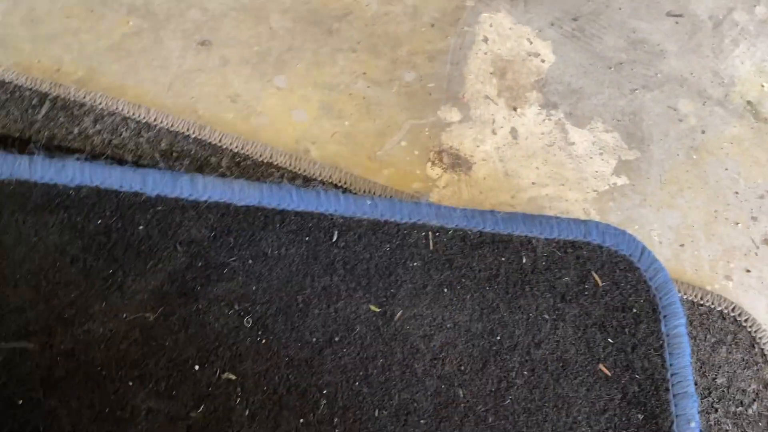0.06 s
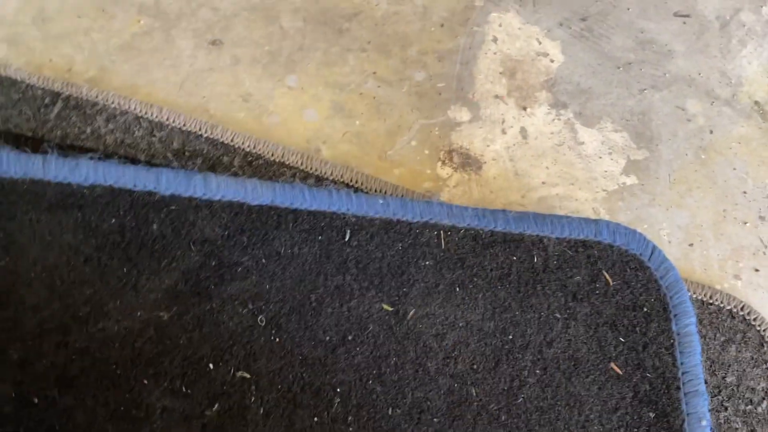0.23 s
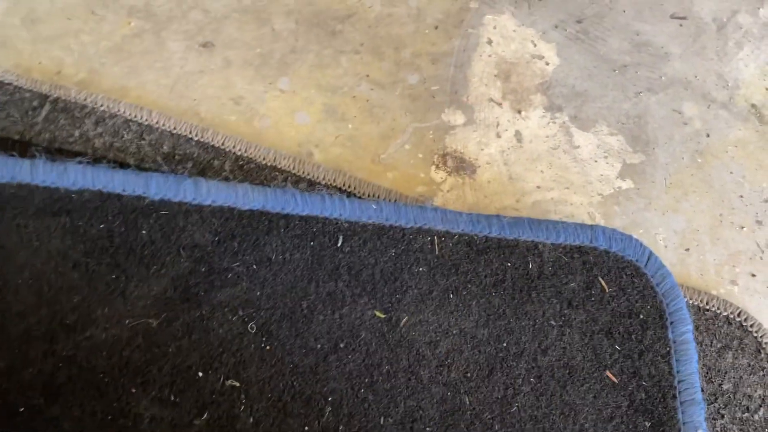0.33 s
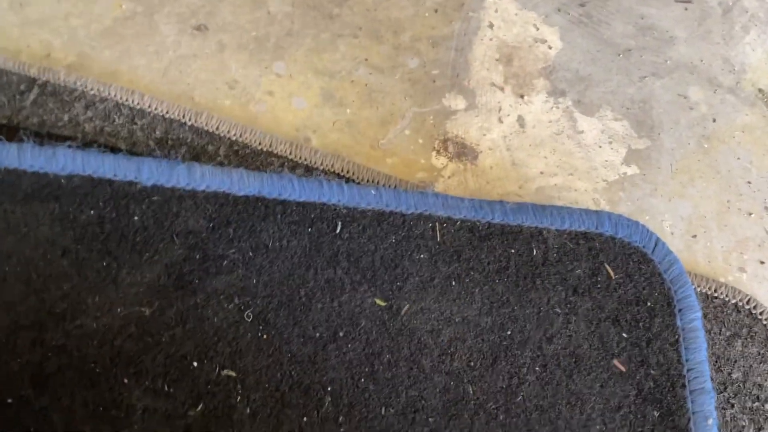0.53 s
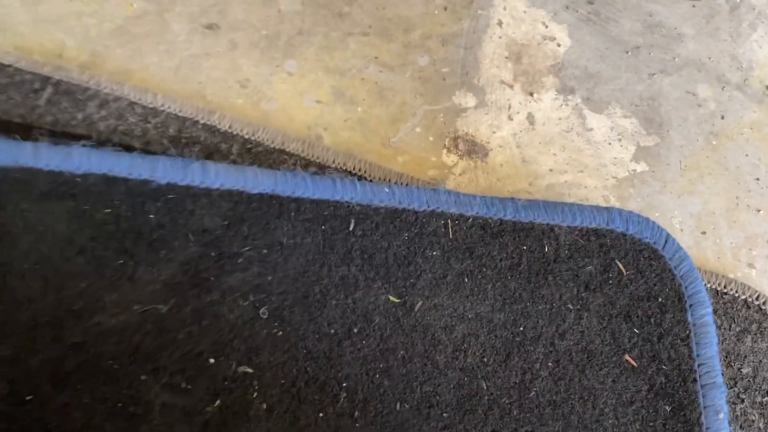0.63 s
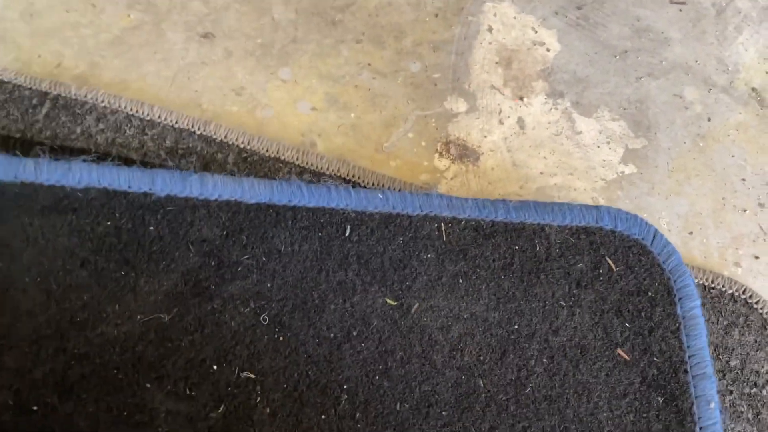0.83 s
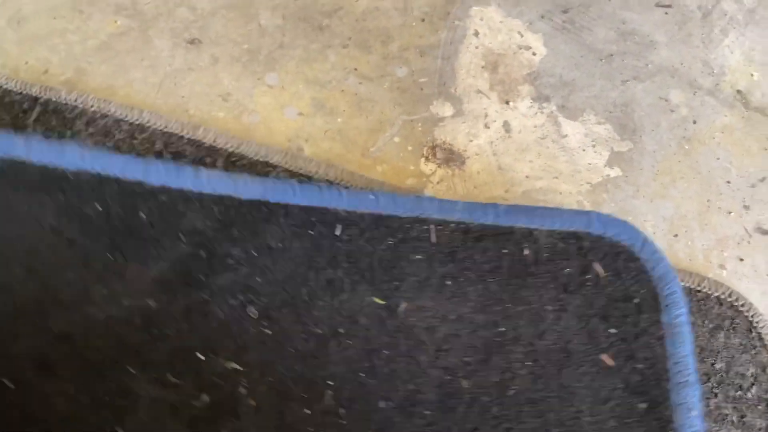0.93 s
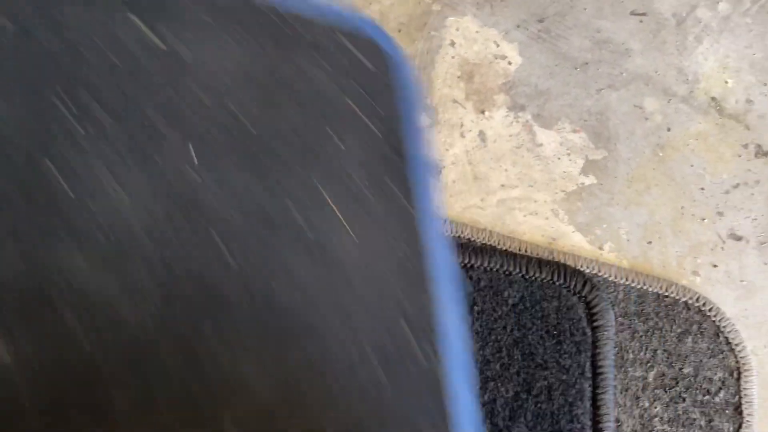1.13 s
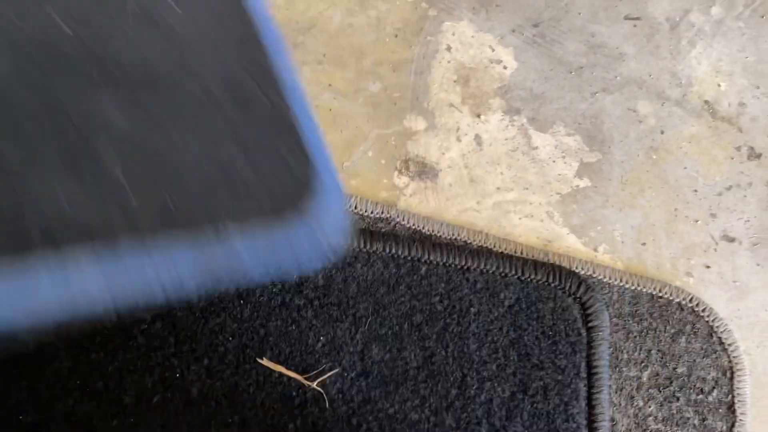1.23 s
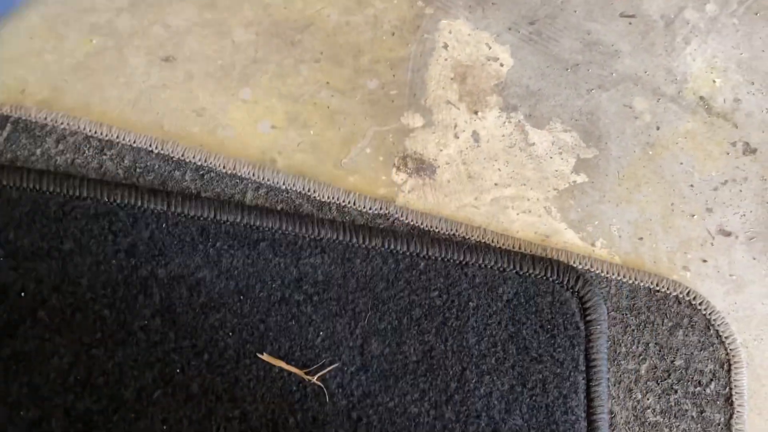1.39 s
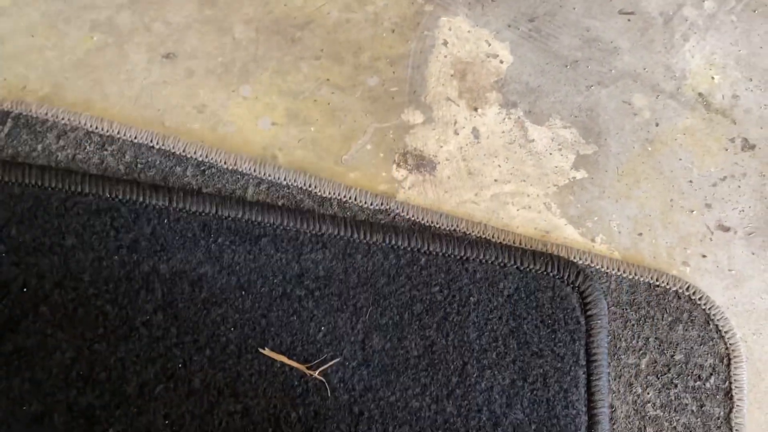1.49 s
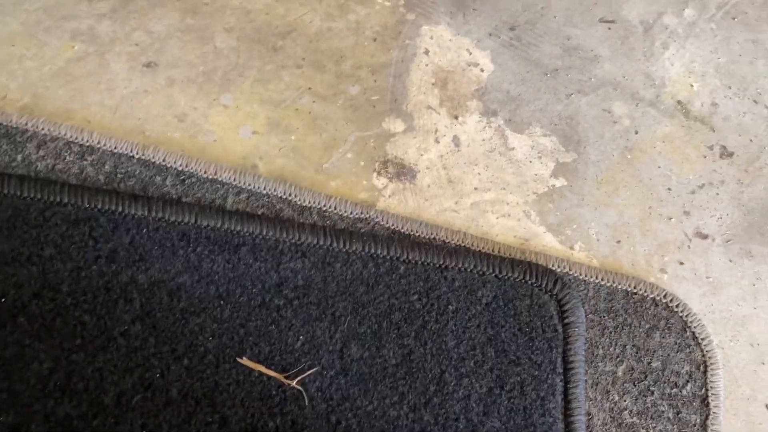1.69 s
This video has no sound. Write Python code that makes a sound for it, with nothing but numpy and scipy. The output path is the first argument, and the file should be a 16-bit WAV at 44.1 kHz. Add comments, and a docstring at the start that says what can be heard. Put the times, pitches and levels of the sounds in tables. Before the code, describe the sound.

A car floor mat drops with a dull thump and slapping scuff, then faint edge ticks, a soft drag and a lighter landing; close stereo microphone, low hum, small hard garage echo.

```python
"""A low hum and faint room hiss come first; then a car floor mat drops and slaps on a concrete garage floor.
A hand ticks on its edge, it is pulled off the pile and lands aside, close to a hand-held stereo microphone.
Thumps are waves of falling pitch, slaps and ticks ring the mat's modes, drags and fibre rub are dense grains.
Feedback delays give the garage's echo; shaped noise makes the hum and hiss."""
import sys
import numpy as np
from scipy import signal
from scipy.fft import rfft, irfft, next_fast_len
from scipy.io import wavfile

SR = 44100
rng = np.random.default_rng(int(sys.argv[2]) if len(sys.argv) > 2 else 0)


def dump_mix(stems):
    """Bounce the given channels to the path in sys.argv[1] as a 16-bit WAV at rate SR."""
    frames = np.atleast_2d(stems).T  # one column per channel
    limited = np.clip(frames, -1, 1)  # hard clip at full scale
    pcm = np.round(limited * 32767).astype(np.int16)
    wavfile.write(sys.argv[1], SR, pcm)


N = 77175

# Bending thumps of the rubber backing; level is before rise and fade, pitch starts this far above THUMP_END_HZ:
# start_s [s], level_db [dB], pitch_above_end_hz [Hz], glide_s [s], rise_s [s], fade_s [s]
BENDING_THUMPS = [(.2343, -5, 330, .05, .008, .0035), (.2402, -22, 100, .01, .002, .022),
                  (.2464, -28, 230, .1, .002, .012), (.2950, -13, 300, .006, .002, .007),
                  (.8759, -27.5, 1400, .0028, .0002, .016), (1.4326, -20, 950, .015, .0004, .003),
                  (1.4361, -27, 950, .004, .0004, .009), (1.4380, -33, 20, .01, .002, .03)]
# The backing slaps down, level before SLAP_TRIM_DB:
# start_s [s], level_db [dB], brightness_db [dB per octave about 2 kHz]
BACKING_SLAPS = [(.2650, -26, 2), (.2672, -15, 2), (.2705, -16, 1), (.2755, -21, 1), (.2798, -23, 0),
                 (.2875, -16.5, 1.5), (.2941, -14, 2.5), (.3030, -22, 0), (.3085, -21, -1),
                 (.3195, -26, -2), (.3330, -28, -1), (1.4325, -30, -6), (1.4780, -40, 3)]
# Light ticks on the edge binding, and from 1.047 s to 1.064 s dull knocks of the mat scuffing as it drags;
# level before TICK_TRIM_DB: # start_s [s], level_db [dB], brightness_db [dB per octave about 2 kHz]
TICKS_AND_KNOCKS = [(.5450, -50, 3), (.5945, -50, 3), (.7198, -48, 0), (.8149, -41, -.5), (.8204, -43, 1.5),
                    (.8280, -39.5, .5), (.8358, -46, 1), (.9830, -47, 0), (1.0340, -52, -5), (1.0470, -54, -5),
                    (1.0560, -54, -5), (1.0640, -55, -5), (1.3700, -49, 3), (1.5963, -42, 1), (1.5986, -46, 0)]
# Modes of the mat on concrete: pitch_hz [Hz], level_db [dB]
MAT_MODES = [(330, 0), (440, -2), (630, -4), (850, -5), (1040, -5), (1500, -6), (1940, -2), (2550, -4),
             (3900, -6), (5200, -5), (6500, -7), (8500, -11), (10500, -8), (13500, -12)]
# Backing drags and flaps: time_s [s], low_flapping_db [dB], dull_scuff_db [dB], gritty_scuff_db [dB]
DRAG_LEVELS = [(0, -68, -63, -65.5), (.222, -56, -61.5, -68), (.236, -37.5, -46.5, -49.5),
               (.258, -31.5, -48, -56), (.268, -40, -24, -29), (.282, -56, -38, -34),
               (0.292, -36, -29, -36), (.298, -30, -30, -32), (.312, -45, -29.5, -37.5),
               (.33, -48.5, -40.5, -44), (.37, -46.5, -54.5, -52), (.43, -51, -57.5, -62),
               (.49, -59.5, -75, -65), (.7, -57, -77, -68), (.73, -48.5, -60, -82), (.78, -57.5, -65, -84),
               (.82, -56, -50, -70), (.86, -56, -56, -66), (.9, -74, -55, -60), (.95, -58, -54.5, -67),
               (.98, -50, -49.5, -58.5), (1.02, -55, -60, -62), (1.04, -54, -53.5, -62),
               (1.065, -54, -54, -62), (1.09, -55, -72, -65), (1.3, -66.5, -75, -70), (1.39, -57, -70, -76),
               (1.41, -45.5, -48, -54), (1.428, -37.5, -51.5, -61), (1.436, -52, -39.5, -45.5),
               (1.456, -42.5, -38.5, -55.5), (1.49, -49, -53, -59), (1.56, -65, -56, -72),
               (1.592, -59, -52, -55), (1.6, -49, -50, -61), (1.615, -52, -58, -62), (1.65, -56, -61, -56),
               (1.75, -60.5, -80, -96)]
# Spectrum of the low flapping: frequency_hz [Hz], relative_density_db [dB per Hz]
FLAP_SPECTRUM = [(30, -3), (55, 1.5), (110, 4), (200, -5), (350, -10), (600, -29.5), (1500, -36)]
# Spectrum of the dull scuff: frequency_hz [Hz], relative_density_db [dB per Hz]
DULL_SPECTRUM = [(150, -37), (300, -18.5), (450, -1), (700, 1.5), (1050, 4), (1300, -5.5), (2500, -41)]
# Spectrum of the gritty scuff: frequency_hz [Hz], relative_density_db [dB per Hz]
GRIT_SPECTRUM = [(600, -17), (1300, -2), (2200, -2), (2900, -4), (4000, -10), (6500, -16.5), (8500, -57),
                 (16000, -63)]
# Pile fibres rub, level before RUB_TRIM_DB: time_s [s], level_db [dB]
RUB_LEVELS = [(0, -83), (.082, -73.5), (.112, -81.5), (.226, -79), (.229, -56.5), (.242, -52.5), (.27, -56),
              (.306, -56.5), (.316, -64.5), (.4, -75), (.46, -81.5), (.57, -73), (.598, -76), (.628, -80),
              (.79, -78), (.822, -66.5), (.85, -70.5), (1.0, -71), (1.144, -76), (1.208, -68.5),
              (1.24, -78), (1.282, -78.5), (1.364, -72), (1.372, -62.5), (1.395, -63), (1.415, -54),
              (1.45, -61), (1.49, -70), (1.55, -77.5), (1.6, -67.5), (1.63, -74), (1.75, -87)]
# Spectrum of the fibre rub: frequency_hz [Hz], relative_density_db [dB per Hz]
RUB_SPECTRUM = [(1500, -30), (3000, 1), (6500, 4), (10500, 8.5), (12000, 2), (13500, -6), (16000, -14)]
# Spectrum of hum and room hiss: frequency_hz [Hz], relative_density_db [dB per Hz]
ROOM_SPECTRUM = [(28, -56), (40, -2.5), (52, 6.5), (65, 4), (80, 4.5), (100, -21.5), (120, -9), (150, -3),
                 (220, -15), (450, -16), (1000, -18), (2200, -20), (4000, -21.5), (6500, -29), (11500, -42),
                 (13500, -88), (16000, -61)]
# Left-right likeness of diffuse sound: frequency_hz [Hz], likeness [-1 to 1]
DIFFUSE_LIKENESS = [(60, 0.96), (130, 0.98), (290, 0.65), (640, -0.18), (1400, -0.22), (3100, 0.34),
                    (7000, -0.0037)]
# Stereo treble, how much of the right channel is put in the left:
# frequency_hz [Hz], right_share [0 to 1], left_phase_lead [half turns]
TREBLE_STEREO = [(7100, 0, 1), (7700, 1, 1), (9450, 1, 1), (9900, .7, .8), (12100, .7, .2), (12500, 1, 0)]

GLIDE_POWER, THUMP_END_HZ = 2.5, 88
RING_CYCLES, RING_MIN_S = 11, .003  # together the time a mode takes to fall 60 dB
STRIKE_SPREAD_DB, SLAP_CONTACT_S, TICK_CONTACT_S = 3.0, .001, .0003
SLAP_TRIM_DB, TICK_TRIM_DB, SLAP_SOFT_HZ = -9.5, -5, 6500
DRAG_GRAINS_PER_S, DRAG_GRAIN_DB = 9000, 2.5
RUB_GRAINS_PER_S, RUB_GRAIN_DB, RUB_TRIM_DB = 30000, 1.5, 10
LEFT_LAG_S = .00043  # the mat lies nearer the right port
LEFT_DB, DIRECT_SHARE = 0.2, 0.54  # the right port gets -LEFT_DB; the share is of power
GARAGE_T60_S, GARAGE_DB, WALL_CUT_HZ = 0.3, -17, 5000  # T60 before the walls' treble loss
ROOM_TONE_DB = -50.5
BASS_CUT_HZ, CUTOFF_HZ = 36, 16250

HZ = np.fft.rfftfreq(N, 1 / SR) + 1  # 1 Hz up, so that its logarithm exists


def thumps():
    """Each is a wave whose pitch falls fast, then slowly, as it fades: high bending waves arrive first."""
    out = np.zeros(N)
    for start_s, level_db, above_end_hz, glide_s, rise_s, fade_s in BENDING_THUMPS:
        t = np.maximum(np.arange(N) / SR - start_s, 0)
        pitch_hz = THUMP_END_HZ + above_end_hz / (1 + t / glide_s) ** GLIDE_POWER
        phase = 2 * np.pi * np.cumsum(pitch_hz * (t > 0)) / SR
        envelope = (1 - np.exp(-t / rise_s)) * np.exp(-t / fade_s)
        out += amp(level_db) * envelope * np.sin(phase)
    return later_at_left(out)


def slaps():
    """Blows of the backing ring the mat; soft rubber contact dulls them."""
    soft = signal.butter(2, SLAP_SOFT_HZ, fs=SR, output="sos")
    blows = signal.sosfilt(soft, strikes(BACKING_SLAPS, SLAP_TRIM_DB, SLAP_CONTACT_S))
    blows[0] = np.roll(blows[0], int(LEFT_LAG_S * SR))
    return blows


def drag():
    """One stream of grit and fibre catches drives the mat's low, middle and upper ranges."""
    catches = grains(DRAG_GRAINS_PER_S, DRAG_GRAIN_DB)
    out = np.zeros((2, N))
    for level_db, spectrum in zip(in_time(DRAG_LEVELS), (FLAP_SPECTRUM, DULL_SPECTRUM, GRIT_SPECTRUM)):
        out += amp(level_db) * nearby(colour(catches, spectrum))
    return out


def ticks():
    """Short contacts ring the mat: a hand's ticks on the edge binding, and a few dull knocks as the mat scuffs
    along."""
    return strikes(TICKS_AND_KNOCKS, TICK_TRIM_DB, TICK_CONTACT_S)


def rub():
    """Pile fibres hiss: dense small catches, drawn separately for left and right."""
    hiss = colour(grains(RUB_GRAINS_PER_S, RUB_GRAIN_DB), RUB_SPECTRUM)
    return amp(in_time(RUB_LEVELS)[0] + RUB_TRIM_DB) * hiss


def garage(x):
    """Eight feedback delays a side, duller on every round."""
    size = next_fast_len(N + SR)
    w = 2 * np.pi * np.fft.rfftfreq(size)  # radians per sample
    wall = 1 / (1 + 1j * w * SR / (2 * np.pi * WALL_CUT_HZ))
    lags = rng.uniform(.008, .03, (2, 8, 1)) * SR
    loop = amp(-60 * lags / SR / GARAGE_T60_S) * wall * np.exp(-1j * w * lags)
    signs = rng.choice([-1, 1], (2, 8, 1))
    response = (loop / (1 - loop) * signs).sum(axis=1)  # all rounds of each loop
    return irfft(rfft(x, size) * response, size)[:, :N]


def room_tone():
    """Steady noise shaped into a low hum and hiss, spread across left and right."""
    noise = rng.standard_normal((2, N))
    return amp(ROOM_TONE_DB) * diffuse(colour(noise, ROOM_SPECTRUM))


def strikes(events, trim_db, contact_s):
    """Every blow rings the mat's modes, spread over the contact time, with strengths of its own at each port."""
    start_s, level_db, tilt_db = np.transpose(events)
    draws = rng.standard_normal((len(start_s), len(MAT_MODES), 3))
    late_s = contact_s * rng.random((len(start_s), len(MAT_MODES)))
    out = np.zeros((2, N))
    for k, (hz, mode_db) in enumerate(MAT_MODES):
        strength = np.sign(draws[:, k, 2]) * amp(STRIKE_SPREAD_DB * draws[:, k, :2].T)
        blow_db = level_db + trim_db + mode_db + tilt_db * np.log2(hz / 2000)
        clicks = np.full((2, N), 1e-18)
        clicks[:, ((start_s + late_s[:, k]) * SR).astype(int)] = strength * amp(blow_db)
        r = amp(-60 / ((RING_MIN_S + RING_CYCLES / hz) * SR))  # decay per sample
        w = 2 * np.pi * hz / SR
        out += signal.lfilter([0, np.sin(w)], [1, -2 * r * np.cos(w), r * r], clicks)
    return out


def grains(per_s, spread_db):
    """Two rows of dense random clicks of uneven size."""
    sizes_db = spread_db * np.minimum(rng.exponential(1, (2, N)), 5)
    sizes = amp(sizes_db) * rng.choice([-1, 1], (2, N))
    return sizes * (rng.random((2, N)) < per_s / SR)


def later_at_left(x):
    """The farther left port hears the same wave later, by whole samples."""
    return np.array([np.roll(x, int(LEFT_LAG_S * SR)), x])


def nearby(pair):
    """Part of the sound is the same at both ports, reaching the left one later."""
    n = np.arange(N)
    same = np.array([np.interp(n - LEFT_LAG_S * SR, n, pair[0]), pair[0]])
    return np.sqrt(DIRECT_SHARE) * same + np.sqrt(1 - DIRECT_SHARE) * diffuse(pair[::-1])


def diffuse(pair):
    """Two unrelated signals become left and right, alike in the bass."""
    alike = np.clip(at_hz(DIFFUSE_LIKENESS, HZ), -1, 1)
    mid, side = rfft(pair)
    common = np.sqrt(.5 + alike / 2) * mid
    opposed = np.sqrt(.5 - alike / 2) * side
    return irfft(common + opposed * [[1], [-1]], N)


def colour(x, spectrum):
    """Filters x by the spectrum; rms 1."""
    return rms_one(irfft(rfft(x) * amp(at_hz(spectrum, HZ)), N))


def amp(db):
    """Decibels become an amplitude factor."""
    return 10 ** (np.asarray(db) / 20)


def rms_one(x):
    """Scales x to an rms of 1 over all its rows."""
    return x / np.sqrt(np.mean(x ** 2) + 1e-20)


def in_time(rows):
    """Draws straight lines in dB between the rows, one curve a column."""
    time_s, *columns = np.transpose(rows)
    return [np.interp(np.arange(N) / SR, time_s, column) for column in columns]


def at_hz(points, hz):
    """Reads a table at any frequency, linear over log frequency."""
    point_hz, values = np.array(points).T
    return np.interp(np.log(hz), np.log(point_hz), values)


def scene():
    """The mat close by, its echo in the garage, and the room tone beneath."""
    mat = thumps() + slaps() + drag() + ticks() + rub()
    echo = amp(GARAGE_DB) * diffuse(garage(mat.mean(axis=0)))
    return mat * amp([[LEFT_DB], [-LEFT_DB]]) + echo + room_tone()


def record(dry):
    """Left treble is partly a phase-turned copy of the right: opposite near 8 to 9 kHz, in phase at 12.5 kHz.

    Deep bass and the very top are cut."""
    left, right = rfft(dry)
    hz, share, turns = np.transpose(TREBLE_STEREO)
    share, turns = np.interp(HZ, hz, share), np.interp(HZ, hz, turns)
    turned_right = right * np.exp(1j * np.pi * turns)
    left = share * turned_right + np.sqrt(1 - share ** 2) * left
    pair = irfft(np.array([left, right]), N)
    pair = signal.sosfilt(signal.butter(2, BASS_CUT_HZ, "high", fs=SR, output="sos"), pair)
    return signal.sosfilt(signal.cheby2(16, 70, CUTOFF_HZ, fs=SR, output="sos"), pair)


dry = scene()
out = record(dry)
dump_mix(out)
```